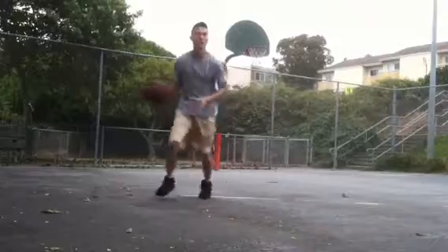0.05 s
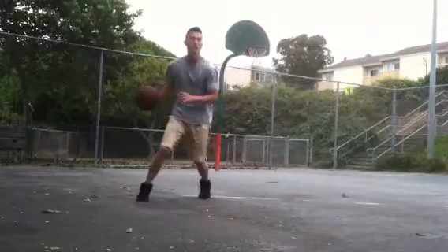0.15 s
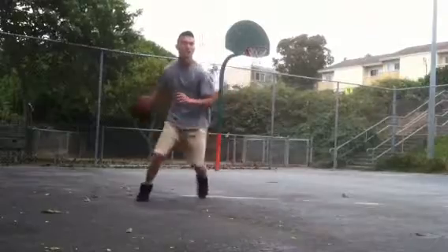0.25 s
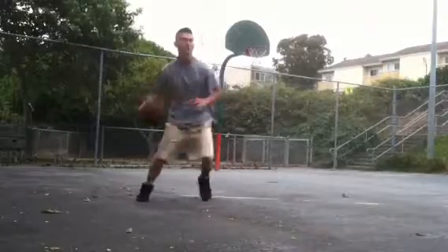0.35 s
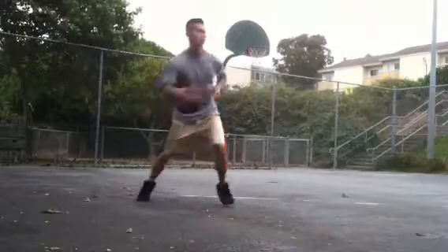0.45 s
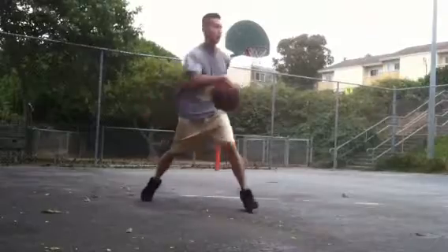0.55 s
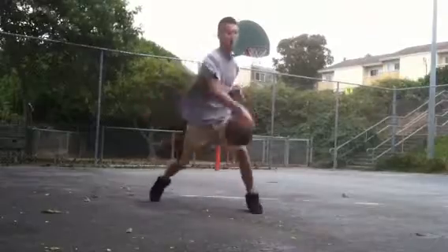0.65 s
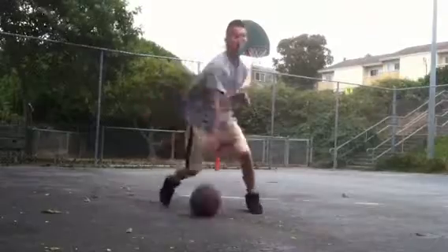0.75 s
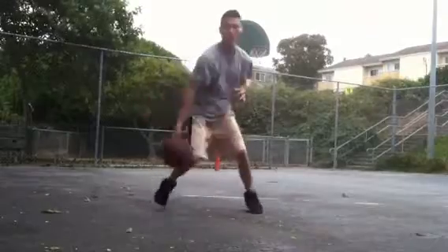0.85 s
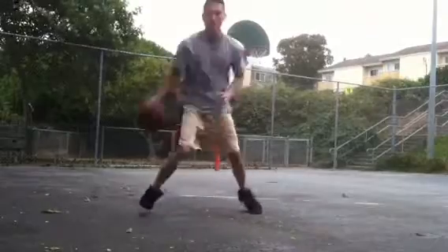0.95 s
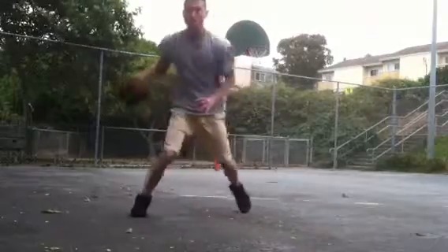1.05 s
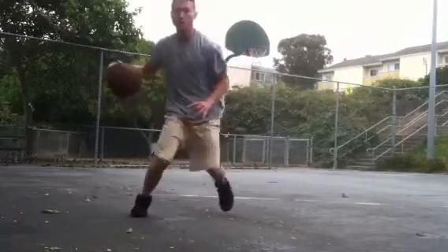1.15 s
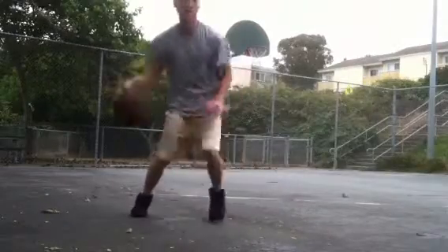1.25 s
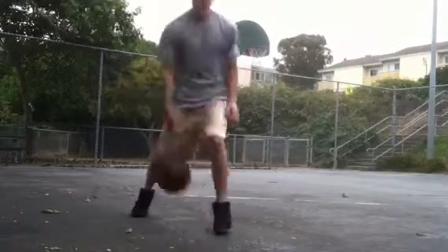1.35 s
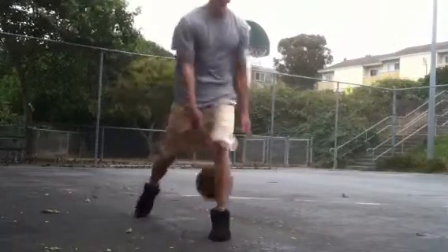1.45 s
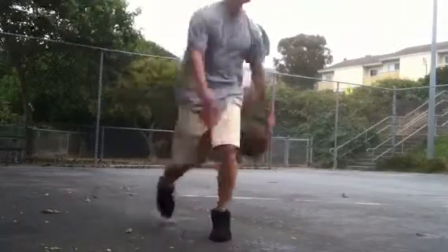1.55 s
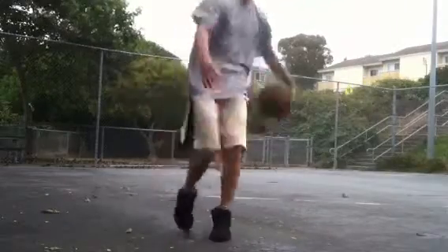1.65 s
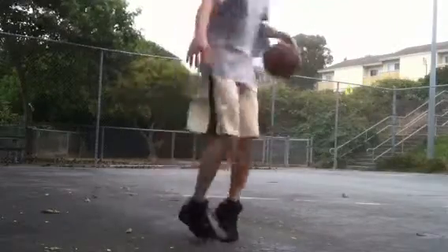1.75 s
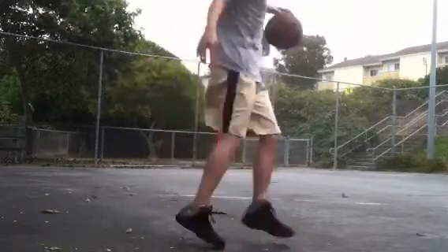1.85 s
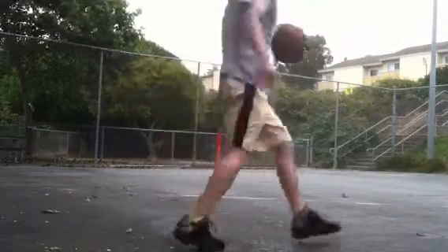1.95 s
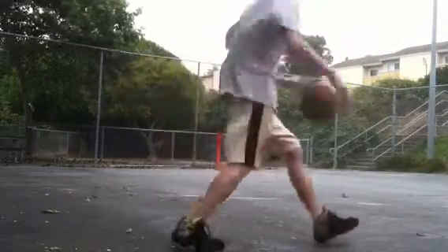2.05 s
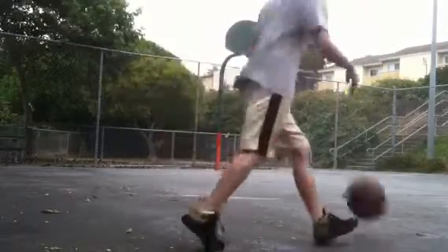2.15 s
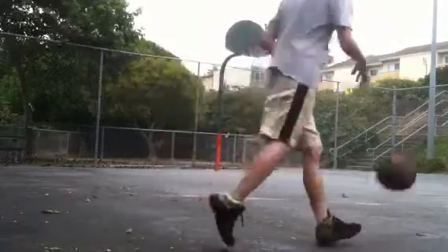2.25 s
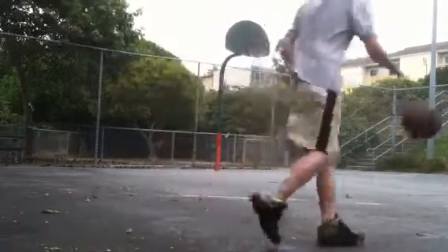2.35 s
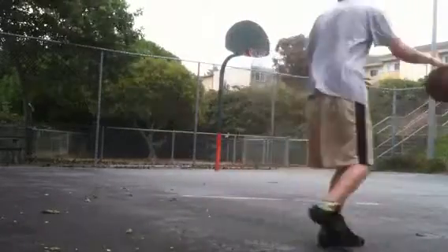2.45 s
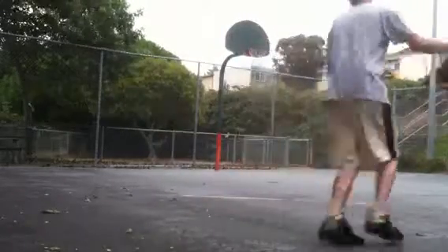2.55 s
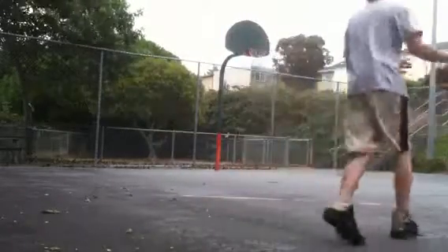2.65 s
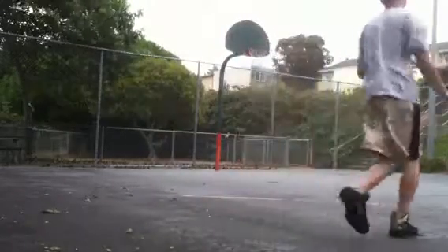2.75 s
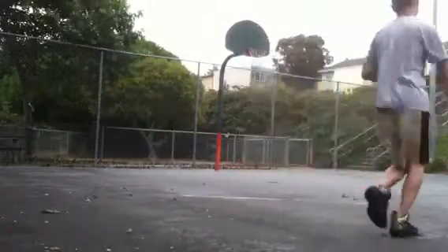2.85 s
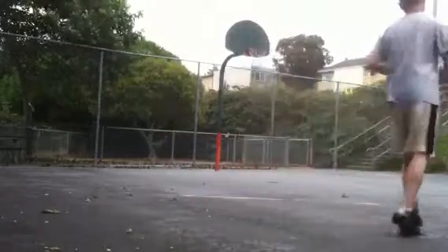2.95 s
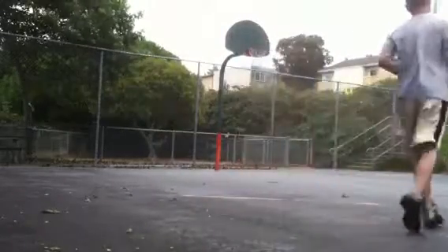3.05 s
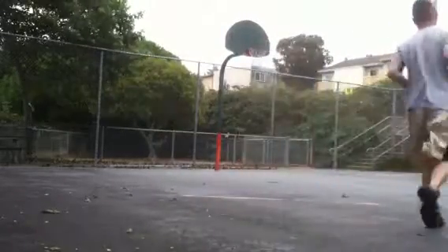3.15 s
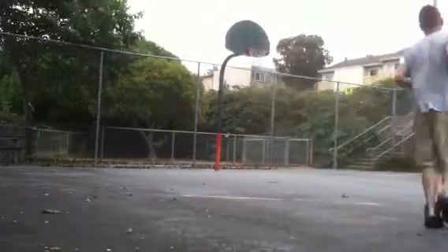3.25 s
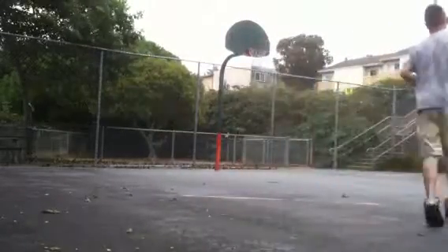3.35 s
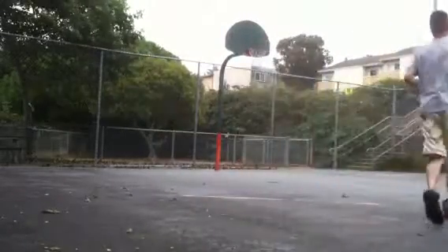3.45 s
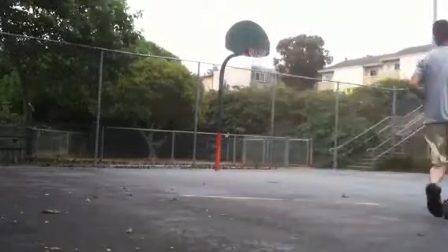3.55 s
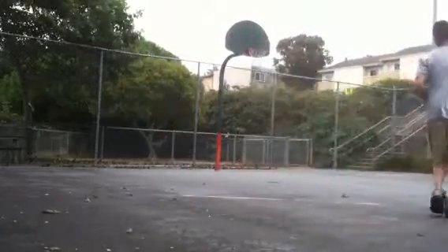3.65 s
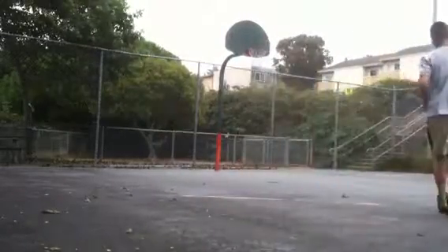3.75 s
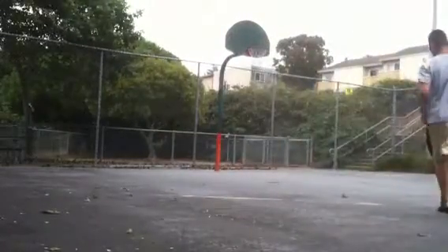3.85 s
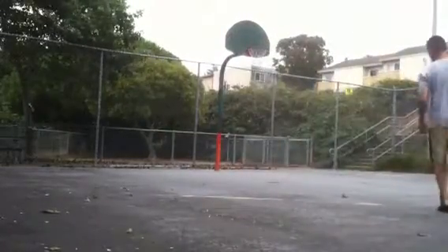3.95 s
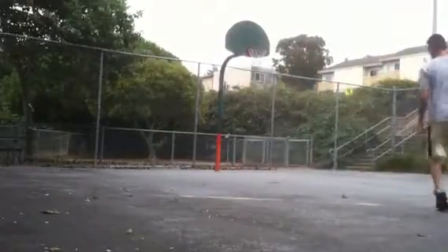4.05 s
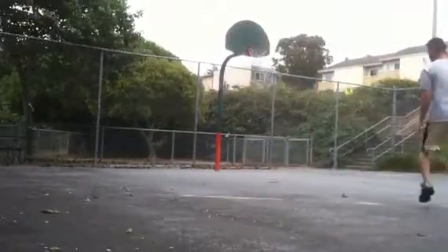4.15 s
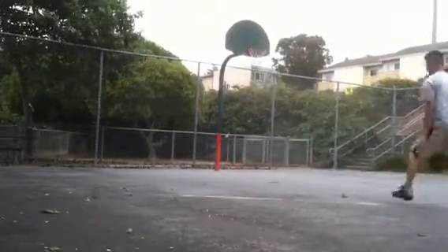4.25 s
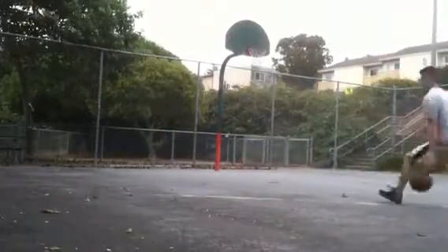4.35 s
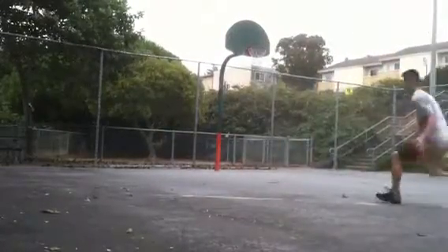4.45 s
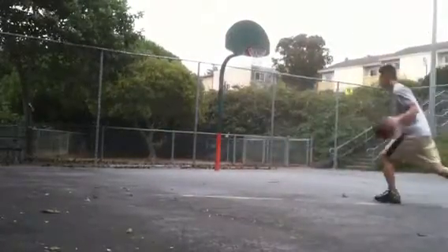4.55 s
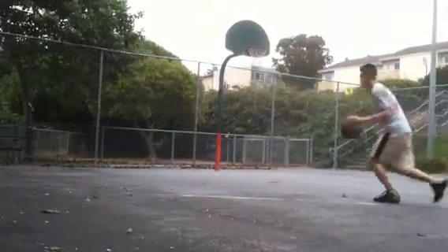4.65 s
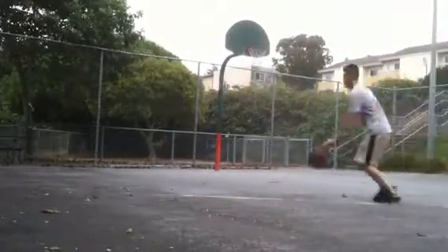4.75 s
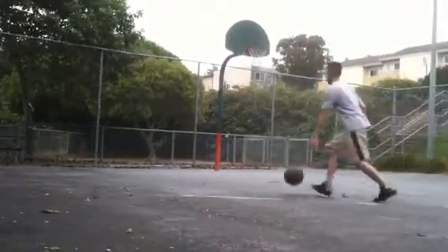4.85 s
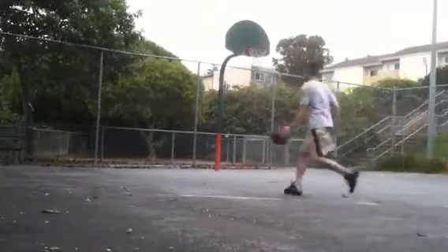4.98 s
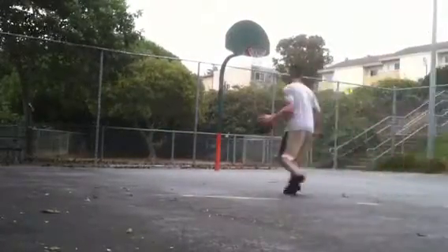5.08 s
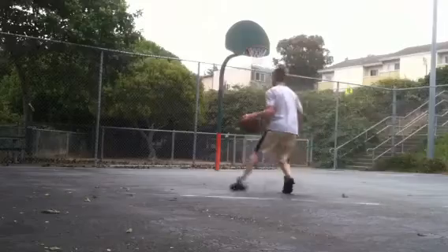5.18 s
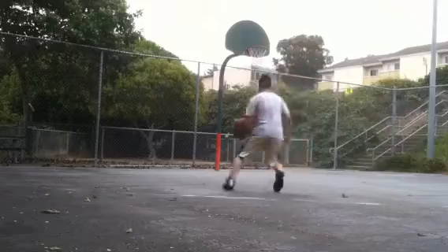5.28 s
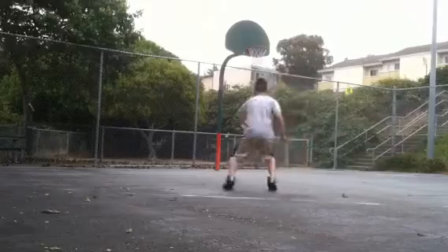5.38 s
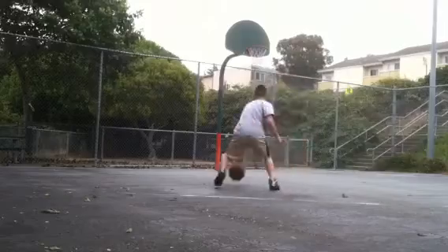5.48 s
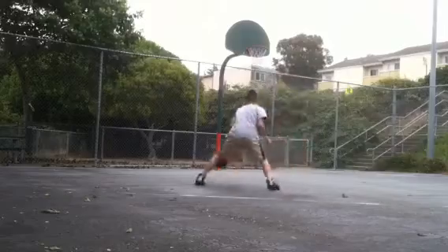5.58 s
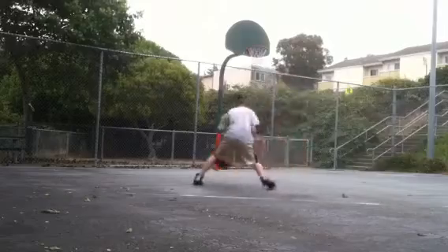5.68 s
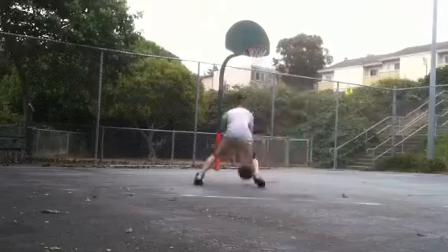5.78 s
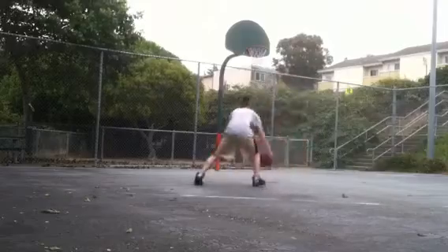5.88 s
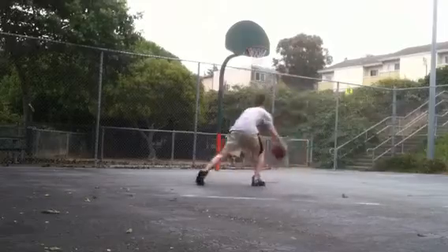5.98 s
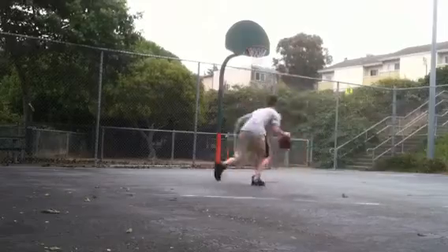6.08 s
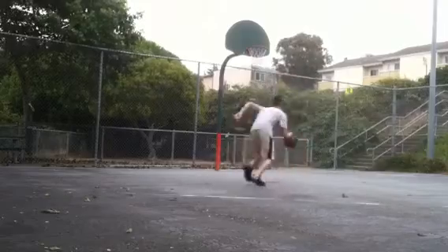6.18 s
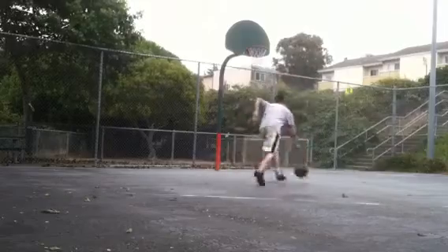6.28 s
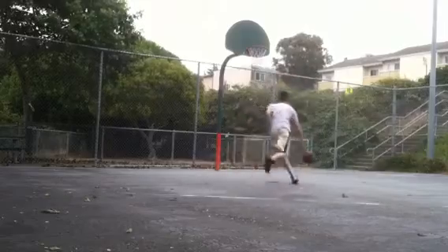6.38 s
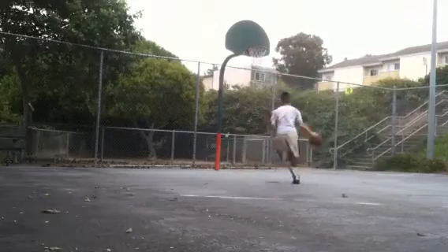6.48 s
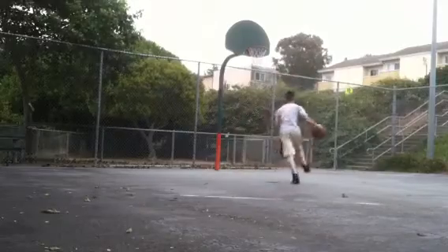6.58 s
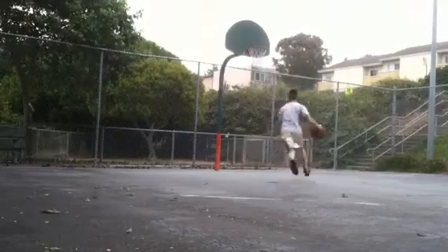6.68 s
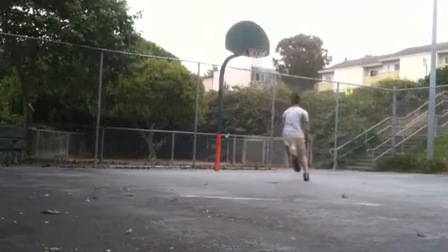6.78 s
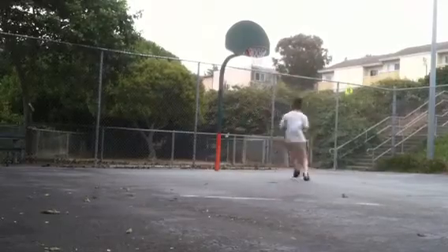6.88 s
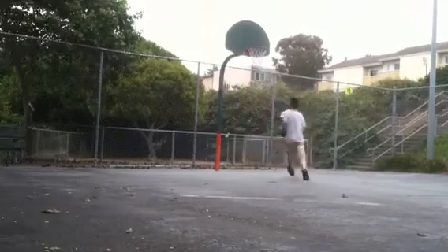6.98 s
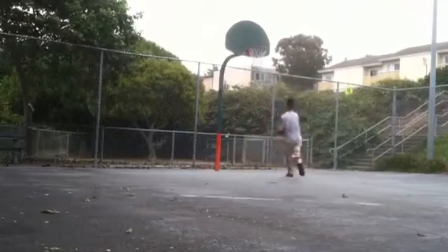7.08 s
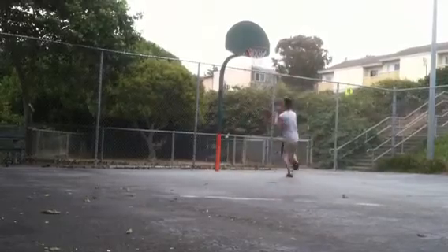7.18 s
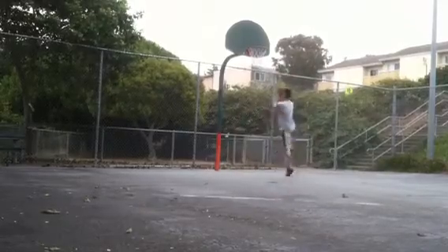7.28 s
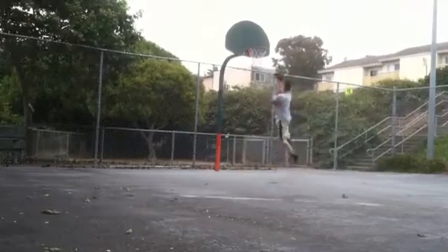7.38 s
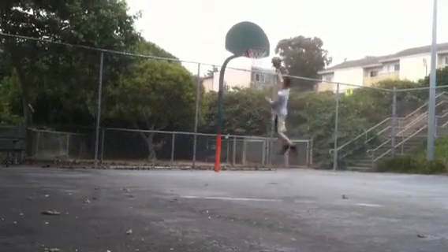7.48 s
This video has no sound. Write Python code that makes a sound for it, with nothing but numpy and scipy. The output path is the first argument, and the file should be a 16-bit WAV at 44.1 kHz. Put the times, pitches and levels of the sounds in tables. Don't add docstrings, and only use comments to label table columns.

```python
import sys
import numpy as np
from scipy import signal
from scipy.fft import rfft, irfft
from scipy.io import wavfile

SR = 44100
rng = np.random.default_rng(int(sys.argv[2]) if len(sys.argv) > 2 else 0)


def digitize_waveform(pressure):
    field = np.atleast_2d(pressure).T
    bounded = np.clip(field, -1, 1)
    quanta = np.round(bounded * 32767).astype(np.int16)
    wavfile.write(sys.argv[1], SR, quanta)


def makeup_ratio(level_db):
    decades = np.asarray(level_db, float) / 20
    return 10 ** decades


N = 331632

# pitch_hz, level_db (per Hz)
TOWN_SPECTRUM = [(37, -35), (146, 3.5), (219, -4), (450, -12), (978, -6), (1960, -15), (11800, -39),
                 (14500, -48)]
# pitch_hz, level_db (per Hz)
LEAF_SPECTRUM = [(3000, -0.5), (5000, -9.5), (8500, -4), (11000, -9), (13500, -23)]
# time_s, level_db
GUST_LEVEL = [(0, -63), (0.84, -60), (1.4, -66), (2.8, -62.5), (3.4, -65), (3.8, -58.5), (4.9, -76),
              (5.34, -53.5), (6.16, -55), (6.41, -51.5), (7.52, -50.5)]
TOWN_DB = -54
BREEZE_DB, BREEZE_FOLLOWS = -51, 0.042

# centre_s, level_db (rms), spread_ms
WIND_PUFFS = [(0.441, -45, 16), (1.421, -48, 19), (2.49, -43.5, 6.7), (2.791, -46, 16), (2.821, -37.5, 12),
              (2.873, -40.5, 16), (4.981, -38, 3.5), (5.419, -41.5, 19), (5.479, -42.5, 23),
              (5.53, -27, 8.9), (5.556, -24.5, 9.7), (5.584, -30, 8.6), (5.691, -35.5, 15.4),
              (5.716, -29.5, 6), (5.75, -36.5, 19.6), (5.779, -36.5, 8.5), (5.987, -32.5, 8.4),
              (6.176, -41, 8.6), (6.511, -32.5, 9.9), (6.548, -43, 11), (7.288, -46, 17), (7.4, -48.5, 33)]
# centre_s, level_db (rms), spread_ms
FOOTFALLS = [
    (0.686, -41, 8.9),
    (1.071, -41.5, 7.5),
]
PUFF_HZ, PUFF_SLOWS = 156, 0.29
FOOTFALL_HZ = 266

# start_s, level_db (rms), pitch_hz (centre), t60_ms
TAP_STROKES = [(.205, -44, 890, 110), (1.066, -45, 716, 78), (1.092, -42, 1610, 150),
               (1.105, -52, 2210, 25), (2.762, -49.5, 4660, 27), (2.861, -53, 5900, 22),
               (3.139, -45.5, 610, 38), (3.898, -47.5, 580, 60), (3.912, -45, 700, 46),
               (6.36, -54, 2800, 25), (6.459, -45, 583, 52), (6.853, -43, 470, 120)]
# start_s, level_db (rms), pitch_hz (centre), rise_ms, t60_ms
DRAG_STROKES = [(0.211, -53.5, 1400, 9.1, 350), (.645, -59, 2980, 8, 220), (1.463, -31.5, 4930, 4.7, 42),
                (1.961, -57.5, 2900, 4.3, 240), (2.727, -51.5, 7000, 1.4, 130),
                (3.335, -59, 2500, 5.5, 120), (5.059, -56, 8000, 3, 73), (5.252, -36.5, 2880, 24, 207),
                (5.264, -44, 760, 10, 230), (5.451, -46, 4520, 6.1, 310), (5.465, -35.5, 3000, 2.2, 50),
                (5.477, -37, 1950, 1.9, 197), (5.643, -41.5, 2320, 22, 200), (5.65, -39, 820, 12, 270),
                (6.852, -52, 2500, 1.9, 99)]
# start_s, level_db (rms), pitch_hz (centre), rise_ms, t60_ms
PALM_STROKES = [
    (.752, -54, 9800, 4.3, 63),
    (0.805, -37, 8400, 17, 48),
    (0.814, -50, 8400, 12, 230),
]
TAP_RISE_MS = 1.9
TAP_OCTAVES, DRAG_OCTAVES, PALM_OCTAVES = 1.12, 1.84, 0.59
FIRST_GRAIN = 5.8

# start_s, snap_db (peak), ring_hz (at the start), ring_db,
# top_hz (upper edge)
BOUNCE_ATTACKS = [(0.8251, -13.5, 1350, -23, 7340), (1.4693, -14, 3300, -17.5, 12000),
                  (1.4915, -5.5, 2250, -13, 3930), (2.2475, -5.5, 2040, -10.5, 8000),
                  (2.9487, -11.5, 1780, -10, 14000), (3.6817, -12.5, 2150, -16.5, 8100),
                  (4.3935, -14.5, 1210, -37, 6250), (4.8995, -11.5, 1330, -15.5, 6960),
                  (5.5894, -18.5, 2000, -20.5, 6700), (5.8387, -26.5, 2350, -27.5, 6330),
                  (6.3929, -26, 2210, -16.5, 5250)]
# multiple (of the ring pitch), level_db, t60_ms
AIR_MODES = [
    (1.0, -7, 16.8),
    (2.0, -28, 2.8),
    (4.0, -10, 5.8),
]
SNAP_BACK = 0.15

# thump_db (peak), swell (0-1), lift_db (ring at lift-off), knock_db
BOUNCE_BODIES = [(-6, 0.24, -19, -22), (-11, 0.05, -18.5, -26), (-13.5, 0.03, -44, -29.5),
                 (-15.5, 0.95, -14.5, -26), (-8.5, 0.86, -16, -20), (-8, 0.68, -16, -28.5),
                 (-10.5, 0.2, -17.5, -21), (-14, 0.67, -19, -29), (-17.5, 0.7, -23.5, -45),
                 (-19.5, 0.7, -31.5, -35), (-11.5, 0.62, -20.5, -31.5)]
# swell (0-1), crest_ms
CREST_TIMES = [(0, 1.0), (.05, 2.1), (.3, 2.1), (.5, 4.8)]
SQUASHED_HZ, FREE_HZ = 245, 150
CONTACT_MS, REBOUND_MS, FREE_T60_MS = 9.5, 2.0, 19
KNOCK_HZ, KNOCK_FALL_OCTAVES = 1291, 1.72

# time_s, delay_ms, level_db
FENCE_ECHOES = [(0.8, 38.5, -27), (1.48, 37, -22), (2.25, 40, -31), (2.95, 41, -22), (3.68, 40.7, -14),
                (4.39, 39.9, -12), (4.9, 37.9, -19), (5.6, 38, -26)]
# delay_ms, level_db
LATE_COPIES = [
    (10.8, -11.5),
    (147, -33),
]
# pitch_hz, level_db, t60_s
TAIL_BANDS = [(122, -8, 0.2), (236, 3.5, 0.41), (500, -16, 0.34), (990, -1, 0.38), (2000, -5.5, 0.49),
              (3660, -11.5, 0.58), (8000, -10.5, 0.34), (12000, -25, 0.086)]
TAIL_DB, TAIL_FOLLOWS = -32.5, 0.53


def rms_one(x):
    return x / np.sqrt(np.mean(x ** 2) + 1e-20)


def band(x, hz, octaves):
    edges = np.clip([hz * 2 ** (-octaves / 2), hz * 2 ** (octaves / 2)], 10, 0.45 * SR)
    return signal.sosfilt(signal.butter(2, edges, "band", fs=SR, output="sos"), x)


def add(out, s, sound):
    i = round(s * SR)
    out[i:i + len(sound)] += sound[:N - i]


def drift(rate):
    r = np.exp(-80 * np.pi * rate / SR)
    white = rng.standard_normal(N // 40 + 2002)
    slow = signal.lfilter([1], [1, -2 * r, r * r], white)[2000:]
    return np.interp(np.arange(N) / 40, np.arange(len(slow)), rms_one(slow))


def coloured(spectrum, patchy_db):
    hz, level_db = np.transpose(spectrum)
    grid = np.maximum(np.arange(N // 2 + 1) * SR / N, 1)
    shape = makeup_ratio(np.interp(np.log(grid), np.log(hz), level_db))
    noise = irfft(rfft(rng.standard_normal(N)) * shape, N)
    return rms_one(noise * makeup_ratio(patchy_db * drift(10.8)))


def town_and_leaves(gust_db):
    town = makeup_ratio(TOWN_DB + 3) * coloured(TOWN_SPECTRUM, patchy_db=1.42)
    leaves = makeup_ratio(gust_db - 8.0) * coloured(LEAF_SPECTRUM, patchy_db=0.2)
    return town + leaves


def wind(breeze_db):
    flutter = rms_one(band(rng.standard_normal(N), 174, 1.96))
    out = makeup_ratio(breeze_db - 5.5 + 3.6 * drift(25.3)) * flutter
    ms = np.arange(-4000, 4000) / SR * 1e3
    puffs = [(*row, PUFF_HZ * (row[2] / 10) ** -PUFF_SLOWS) for row in WIND_PUFFS]
    puffs += [(*row, FOOTFALL_HZ) for row in FOOTFALLS]
    for s, db, spread_ms, hz in puffs:
        eddy = signal.hilbert(band(rng.standard_normal(len(ms)), hz, 0.97))
        size = np.abs(eddy)
        even = np.real(eddy / (size + 0.34 * size.mean())) * 1.92
        swell = np.exp(-0.5 * (ms / spread_ms) ** 2)
        add(out, s + ms[0] / 1000, makeup_ratio(db) * even * swell)
    return out


def shoes_and_palms():
    out, ms = np.zeros(N), np.arange(12000) / SR * 1e3
    strokes = [(s, db, hz, TAP_RISE_MS, t60, TAP_OCTAVES) for s, db, hz, t60 in TAP_STROKES]
    strokes += [(*row, DRAG_OCTAVES) for row in DRAG_STROKES]
    strokes += [(*row, PALM_OCTAVES) for row in PALM_STROKES]
    for s, db, hz, rise_ms, t60, octaves in strokes:
        clumps = np.repeat(rng.standard_normal(200), 60)
        grains = makeup_ratio(2.3 * np.minimum(rng.exponential(1, len(ms)), 4) + 2.44 * clumps)
        grit = rng.standard_normal(len(ms)) * grains
        if rise_ms == TAP_RISE_MS:
            first = FIRST_GRAIN * np.sqrt(4000 / hz) * grains.mean()
            grit[round(rise_ms * SR / 1000)] += first
        fade = makeup_ratio(-60 * np.maximum(ms - rise_ms, 0) / t60)
        stroke = np.clip(ms / rise_ms, 0, 1) ** 2 * fade
        add(out, s, makeup_ratio(db) * rms_one(band(grit, hz, octaves)) * stroke)
    return out


def cracks():
    out, ms = np.zeros(N), np.arange(1500) / SR * 1e3
    late = np.maximum(ms - 0.22, 0)
    for s, snap_db, ring_hz, ring_db, top_hz in BOUNCE_ATTACKS:
        pull, back = np.exp(-((ms - [[0.15], [0.33]]) / 0.06) ** 2)
        snap = SNAP_BACK * back - pull
        slide_hz = ring_hz * (0.635 + 0.43 * np.exp(-late / 0.31))
        turns = np.cumsum(slide_hz * (late > 0)) / SR
        rings = sum(makeup_ratio(db - 60 * late / t60) * np.sin(2 * np.pi * multiple * turns)
                    for multiple, db, t60 in AIR_MODES)
        slap = makeup_ratio(-21 - 60 * late / 29.0) * rng.standard_normal(len(ms)) * (late > 0)
        hit = makeup_ratio(snap_db) * (snap + slap) + makeup_ratio(ring_db) * rings
        add(out, s, signal.lfilter(*signal.butter(3, min(top_hz, 20000), fs=SR), hit))
    return out


def ball():
    out, ms = np.zeros(N), np.arange(3000) / SR * 1e3
    down = 1 / (1 + np.exp((ms - CONTACT_MS) / 0.7))
    flying = np.maximum(ms - CONTACT_MS, 0)
    for (s, *_), (thump_db, swell, lift_db, knock_db) in zip(BOUNCE_ATTACKS, BOUNCE_BODIES):
        crest_ms = np.interp(swell, *np.transpose(CREST_TIMES))
        late = np.maximum(ms - max(crest_ms - 2.4, 0), 0)
        press = swell * ms / CONTACT_MS + (1 - swell) * np.exp(-(late / 3.33) ** 2)
        swing = np.cos(2e-3 * np.pi * SQUASHED_HZ * (ms - crest_ms))
        thump = makeup_ratio(thump_db) * press * down * swing
        knock_hz = KNOCK_HZ * 2 ** (-KNOCK_FALL_OCTAVES * swell)
        rough = 0.84 * rms_one(band(rng.standard_normal(len(ms)), knock_hz, 1.62))
        tone = np.sin(2e-3 * np.pi * knock_hz * late)
        knock = makeup_ratio(knock_db - 60 * late / 29.7) * (tone + rough)
        free_swing = np.sin(2e-3 * np.pi * FREE_HZ * (flying - REBOUND_MS))
        lift = -makeup_ratio(lift_db - 60 * flying / FREE_T60_MS) * free_swing
        grounded = (1 - np.exp(-(late / 0.58) ** 2)) * (thump + knock)
        add(out, s, grounded + 2.8 * lift * (1 - np.exp(-flying / 2.47)))
    return signal.sosfilt(signal.butter(2, 85, "high", fs=SR, output="sos"), out)


def court(direct):
    out, t = np.zeros(N), np.arange(SR // 2) / SR
    when, *fence = np.transpose(FENCE_ECHOES)
    for (s, *_), (_, _, lift_db, _) in zip(BOUNCE_ATTACKS, BOUNCE_BODIES):
        fence_ms, fence_db = [np.interp(s, when, column) for column in fence]
        hit = direct[round(s * SR):][:500]
        add(out, s + fence_ms / 1000, makeup_ratio(fence_db) * band(hit, 2500, 1.4))
        for delay_ms, db in LATE_COPIES:
            add(out, s + delay_ms / 1000, makeup_ratio(db + lift_db + 15.5) * band(hit, 1000, 2.6))
        white = rng.standard_normal((2, len(t)))
        spread = sum(makeup_ratio(db - 60 * t / t60) * rms_one(band(white[k % 2], hz, 1.0))
                     for k, (hz, db, t60) in enumerate(TAIL_BANDS))
        tail_gain = makeup_ratio(TAIL_DB + TAIL_FOLLOWS * lift_db)
        add(out, s, tail_gain * spread * np.clip(t / 0.0012, 0, 1))
    return out


def scene():
    gust_db = np.interp(np.arange(N) / SR, *np.transpose(GUST_LEVEL))
    breeze_db = BREEZE_DB + BREEZE_FOLLOWS * (gust_db - gust_db.mean())
    air = town_and_leaves(gust_db) + wind(breeze_db)
    attack = cracks()
    bounces = attack + ball() + court(attack)
    return (air + shoes_and_palms() + bounces)[None]


def band_limit(x):
    return signal.sosfilt(signal.butter(12, 15640, fs=SR, output="sos"), x)


def record(dry):
    thin = signal.sosfilt(signal.butter(3, 74, "high", fs=SR, output="sos"), dry)
    dull = signal.sosfilt(signal.butter(3, 10500, fs=SR, output="sos"), thin)
    return band_limit(dull)


dry = scene()
out = record(dry)
digitize_waveform(out)
```